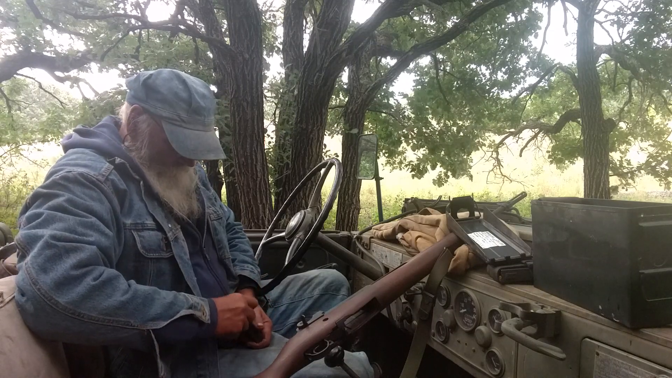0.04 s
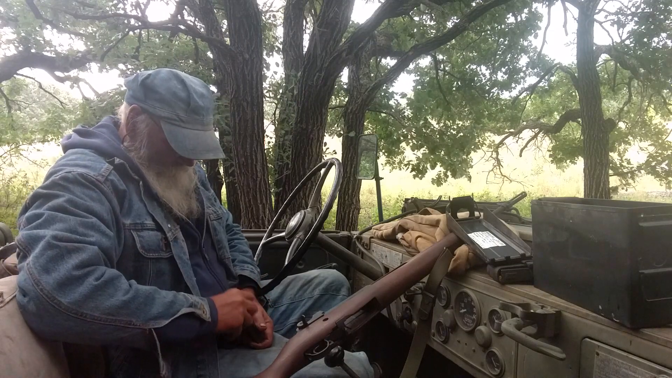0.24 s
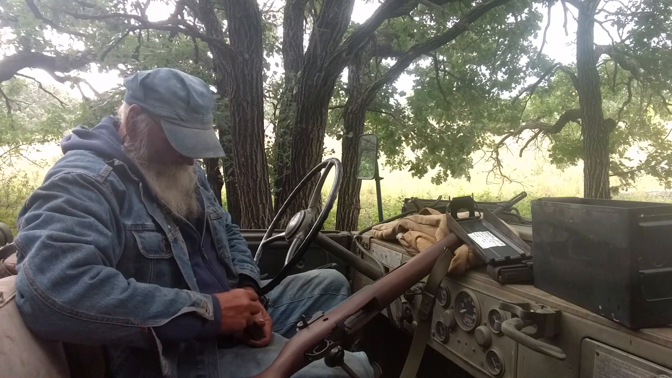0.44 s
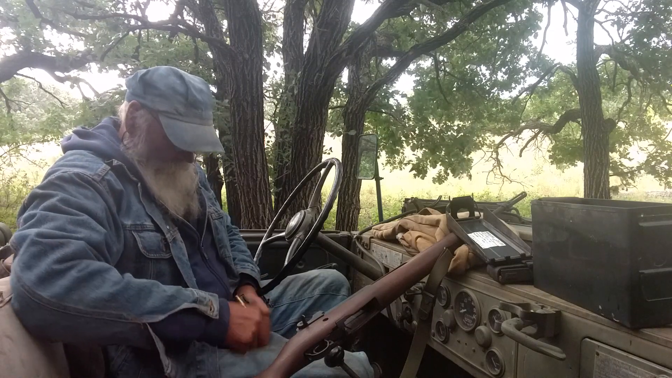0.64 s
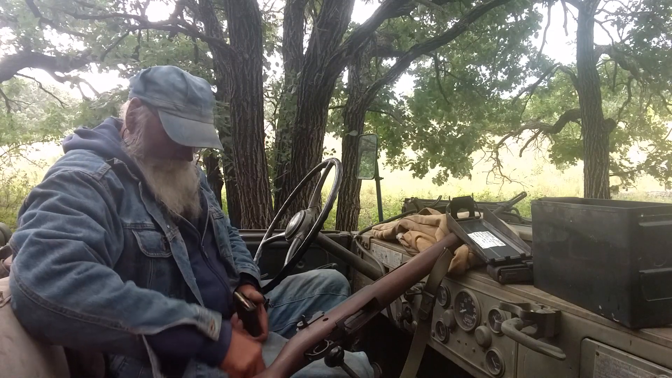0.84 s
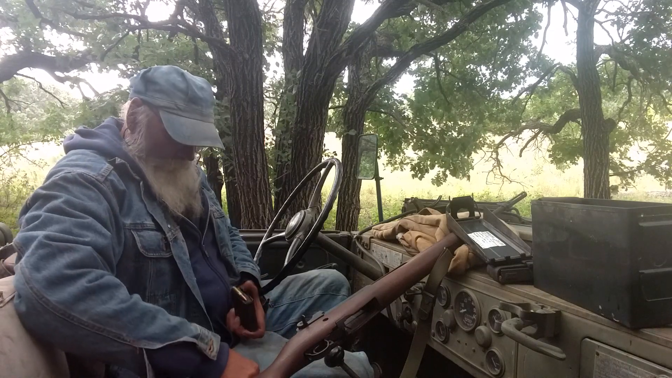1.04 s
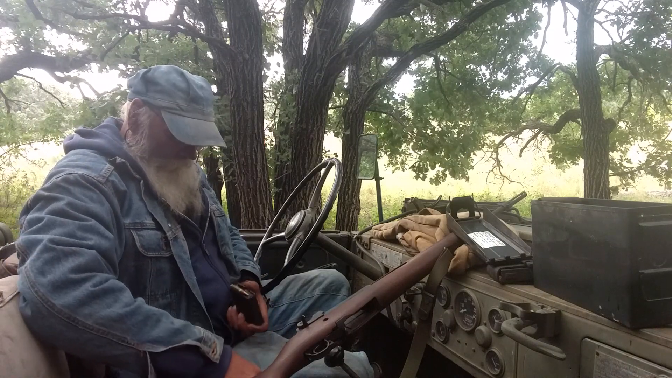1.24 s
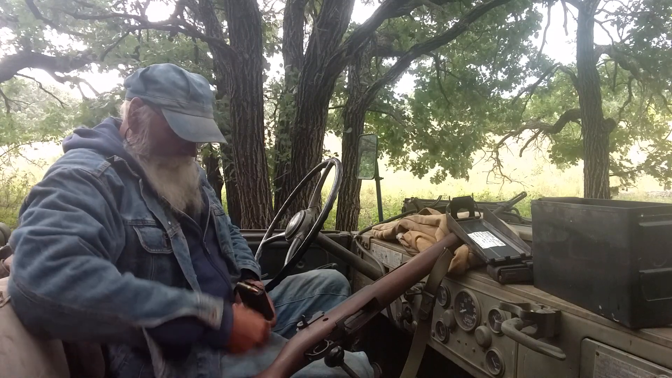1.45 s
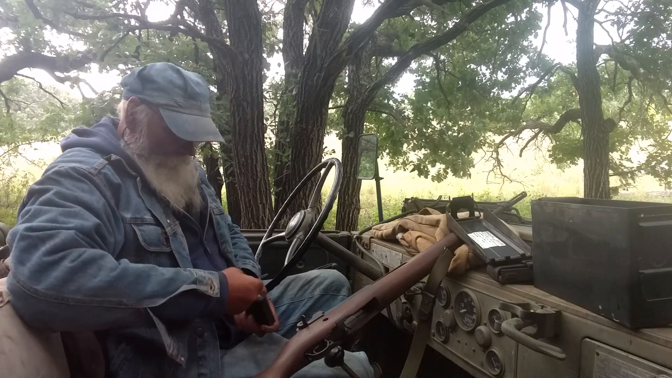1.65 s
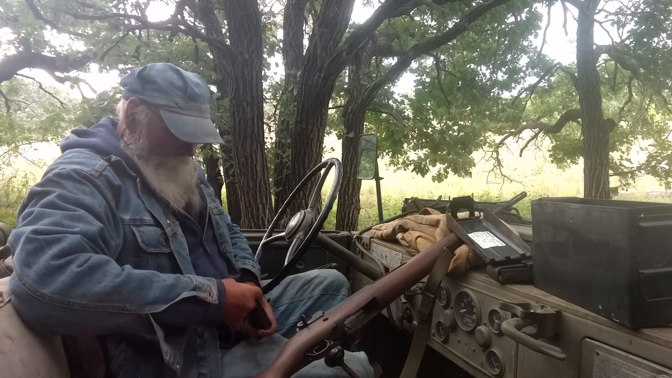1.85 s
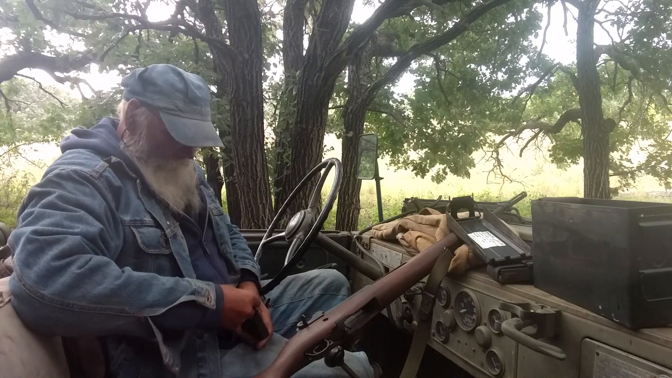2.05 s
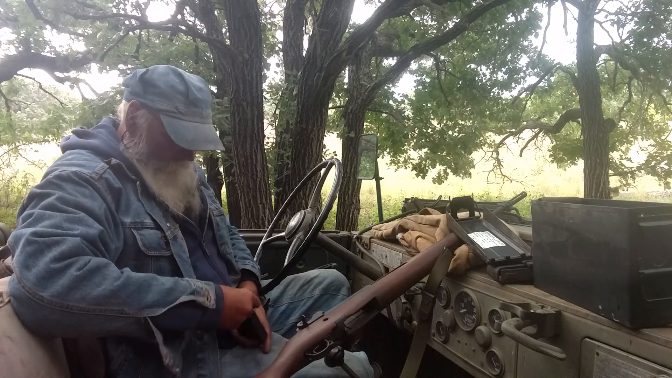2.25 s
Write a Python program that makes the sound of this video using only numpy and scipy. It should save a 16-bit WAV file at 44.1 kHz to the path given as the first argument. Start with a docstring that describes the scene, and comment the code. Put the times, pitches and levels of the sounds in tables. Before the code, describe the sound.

Sharp hollow metallic clicks of cartridges pressed into a magazine outdoors, with faint wind and soft microphone bumps

```python
"""Under trees, wind hisses in the leaves throughout (patchy filtered noise over a lumpy low rumble),
and now and then it bumps the microphone: short low puffs, the strongest in the last half second.
Cartridges pressed into a steel magazine give three knocks early on and three late, the middle late one
a small bounce: each knocks the hollow box (two swelling modes) and rattles its metal, with echoes nearby.
The camera's two ports are each subtracted, slightly late, from the other."""
import sys
import numpy as np
from scipy import signal
from scipy.fft import rfft, irfft, next_fast_len
from scipy.io import wavfile
from scipy.ndimage import uniform_filter1d, map_coordinates

SR = 44100
rng = np.random.default_rng(int(sys.argv[2]) if len(sys.argv) > 2 else 0)


def generate_wav(sig):
    """Save sig (samples, or channels by samples) to the path in sys.argv[1] as 16-bit PCM at SR."""
    pcm = np.round(np.clip(np.atleast_2d(sig).T, -1, 1) * 32767).astype(np.int16)
    wavfile.write(sys.argv[1], SR, pcm)


N = 101430


def amp(db):
    """Decibels to an amplitude factor."""
    return 10 ** (np.asarray(db) / 20)


def unit(x):
    """Scale to an RMS of one over all channels together."""
    return x / np.sqrt(np.mean(x ** 2) + 1e-20)


def along(points, hz):
    """Read a curve of (Hz, value) points on a log frequency axis."""
    point_hz, value = np.transpose(points)
    return np.interp(np.log(hz + 1), np.log(point_hz + 1), value)


def wobble(rate):
    """A smooth random curve with this many knots a second."""
    knots = rng.standard_normal(int(N * rate / SR) + 4)
    return map_coordinates(knots, [np.arange(N) * rate / SR])


def filtered(x, response):
    """Multiply the spectrum of x by a response of frequency; padding leaves room for the tail."""
    size = next_fast_len(x.shape[-1] + 8192)
    spectrum = rfft(x, size) * response(np.fft.rfftfreq(size, 1 / SR))
    return irfft(spectrum, size)[..., :x.shape[-1]]


def near(hz, centre_hz, spread):
    """A bell over octaves, 1 at the centre."""
    return np.exp(-(np.log2(hz / centre_hz) / spread) ** 2 / 2)


def swell(u):
    """Rounded pulse envelope that peaks at 1 when u is 1."""
    return (u * np.exp(1 - u)) ** 3


def wind():
    """Patchy leaf hiss, partly shared by the ports, with a lumpy rumble under it."""
    # Level of the hiss: it dips after the early knocks and slowly recovers.
    # Each row: time in seconds, level in dB.
    hiss_level = [(0, -50), (.15, -46.5), (.29, -52), (.52, -51.5), (.8, -48), (1.19, -44.5), (1.75, -44),
                  (2.3, -44.5)]
    # Spectral shape of the leaves. Each row: frequency in Hz, relative density in dB per Hz.
    leaf_tone = [(20, -35), (60, -10.5), (120, 1.5), (400, -3), (1000, -10.5), (1900, -14.5), (2500, -11),
                 (5000, -13), (8000, -17.5), (12000, -28), (15000, -37), (15350, -67), (16200, -75)]
    # Likeness of the ports. Each row: frequency in Hz, correlation (0 to 1).
    likeness = [(50, 0.38), (300, 0.89), (800, 0.44), (2000, 0.047), (12000, 0.045)]
    # Lean to one side. Each row: frequency in Hz, left over right port in dB.
    side_lean = [(60, -0.5), (500, -2.5), (2000, -0.5), (8000, 0.5), (14000, 10.2)]
    rumble_db, rumble_hz = -15.5, 123  # level against the hiss, upper corner
    lumps_db = 5  # scale of the random swings of the rumble

    # Noise smoothed over time and frequency makes patches of louder and softer hiss.
    noise = signal.stft(rng.standard_normal((2, N + 512)), nperseg=512)[2]
    patches = uniform_filter1d(rng.standard_normal(noise.shape[1:]), 6, 0)
    patches = unit(uniform_filter1d(patches, 14, 1))
    pair = signal.istft(noise * amp(0.95 * patches), nperseg=512)[1][:, :N]

    def mid_side(hz):
        # Half this angle's cosine and sine share the power, so the ports correlate as the table says.
        turn = np.arccos(np.clip(along(likeness, hz), -1, 1)) / 2
        return amp(along(leaf_tone, hz)) * [np.cos(turn), np.sin(turn)]

    mid, side = filtered(pair, mid_side)
    ports = np.array([mid + side, mid - side])
    ports = filtered(ports, lambda hz: amp(np.outer([0.5, -0.5], along(side_lean, hz))))

    def low_band(hz):
        return (hz / 60) / (1 + (hz / 60) ** 2) / (1 + (hz / rumble_hz) ** 2)

    low = filtered(rng.standard_normal((2, N)), low_band)
    rumble = unit(low * amp(lumps_db * wobble(8.2)))

    s, db = np.transpose(hiss_level)
    level = amp(np.interp(np.arange(N) / SR, s, db) + 1.2 * wobble(4.97))
    return level * (unit(ports) + amp(rumble_db) * rumble)


def bumps():
    """Puffs of wind push mainly on the right port: sines under a short swelling envelope."""
    # Each row: start in seconds, envelope peak at the right port in dB, frequency in Hz.
    puffs = [(.090, -42, 70), (.525, -44, 80), (.675, -43, 80), (1.605, -49, 60), (1.700, -44, 45),
             (1.797, -29.5, 96), (1.851, -28.5, 94), (1.866, -22.5, 121), (2.155, -33.5, 89),
             (2.192, -35, 118), (2.225, -41, 50)]
    left_share = -0.03  # of the puff; the right port gets -1
    out = np.zeros(N + SR)
    t = np.arange(SR // 10) / SR
    for s, db, hz in puffs:
        puff = amp(db) * swell(t * hz * 1.13) * np.sin(2 * np.pi * hz * t)
        out[round(s * SR):][:len(t)] += puff
    return out[:N] * np.array([[left_share], [-1]])


def hollow_knock(t, knock_db, first_hz, last_hz, upper_db, upper_hz, rise):
    """The hollow box: a low mode whose pitch glides to rest, less a steady upper mode."""
    settle_s = 0.0042  # time constant of the glide
    upper_rise = 0.73 * rise  # the upper mode swells faster
    turns = last_hz * t + (first_hz - last_hz) * settle_s * (1 - np.exp(-t / settle_s))
    low = amp(knock_db) * swell(t / (3 * rise)) * np.sin(2 * np.pi * turns)
    upper = amp(upper_db) * swell(t / (3 * upper_rise)) * np.sin(2 * np.pi * upper_hz * t)
    return low - upper


def metal_rattle(t, rise, metal_db, ring_hz, tilt_db):
    """Brass and steel: a noisy crack of small contacts and unsteady ringing modes, on two ports."""
    # Frequencies of the metal modes in Hz.
    mode_hz = [1340, 1710, 2070, 2375, 3320, 3540, 3860, 4300, 5545, 5835, 6490, 7160, 8550, 11850, 13900]
    # One row for each mode: relative level in dB, time to decay by 60 dB in seconds.
    modes = [(-8, 0.031), (-11, 0.034), (-10, 0.061), (-3, 0.036), (2.5, 0.021), (3.5, 0.026), (-4, 0.034),
             (0, .015), (-3.5, 0.025), (-4, 0.022), (-5, .015), (-7.5, 0.034), (-6, 0.013), (-34, .02),
             (-3, 0.014)]
    # Tone of the bare contacts. Each row: frequency in Hz, gain in dB.
    crack_tone = [(300, -37), (600, -3), (2000, 7.5), (5000, 7), (10000, 0), (14500, -11), (16000, -20)]
    contact_s, crack_db = 0.0034, 22  # time scale of the contacts, gain of their crack
    boost_db, boost_oct = 13, 0.1  # lift of modes near ring_hz, its spread in octaves
    line_width_hz, ring_rise_s = 40, 0.0019  # unsteadiness of the modes, time scale of their build-up

    late = np.maximum(t - 1.02 * rise, 0)  # the metal starts while the knock is still swelling
    u = late / contact_s
    contacts = rng.standard_normal((2, len(t))) * u * np.exp(-2 * u ** 1.37)
    contacts /= np.linalg.norm(contacts[0])

    def tilt(hz):
        return tilt_db * np.log2((hz + 1) / 4000)

    crack = amp(crack_db) * filtered(contacts, lambda hz: amp(along(crack_tone, hz) + tilt(hz)))

    hz = np.array(mode_hz)[:, None]
    db, t60 = np.transpose(modes)[..., None]
    steps = rng.standard_normal((len(modes), len(t)))
    wander = np.cumsum(steps, axis=1) * np.sqrt(line_width_hz * 2 * np.pi / SR)
    phase = 2 * np.pi * (hz * t + rng.random(hz.shape)) + wander
    mode_db = db + boost_db * near(hz, ring_hz, boost_oct) + tilt(hz) + rng.normal(0, 0.69, hz.shape)
    ring = (amp(mode_db - 60 * late / t60) * np.sin(phase)).sum(0)
    ring = ring * (1 - np.exp(-(late / ring_rise_s) ** 2))
    return amp(metal_db) * (ring + crack)


def magazine():
    """Every contact knocks and rattles, and reaches the two ports at its own level and lag."""
    # Knocks of the cartridges; the fifth is a small bounce.
    # Each row: start in seconds, knock level in dB, first and last pitch of the low mode in Hz,
    # upper mode level in dB, upper mode pitch in Hz, rise in seconds (a third of the low mode's time to peak),
    # metal gain in dB, favoured ring in Hz, metal tilt in dB per octave,
    # left over right port in dB, delay of the left port in seconds.
    knocks = [(0.2, -35.5, 756, 740, -52, 1120, 0.0017, -47, 2370, -0.5, -13, 0.000069),
              (0.2223, -14, 1114, 463, -15, 1062, 0.0012, -27, 6040, 0, -5, 0.00012),
              (0.3636, -27.5, 720, 638, -45, 1110, 0.0011, -52, 3570, -2, 3, 0.00013),
              (1.7576, -29.5, 734, 665, -37, 994, 0.0013, -33, 5400, 1, -11, .00012),
              (1.7750, -44, 740, 670, -54, 1070, 0.0024, -48, 5600, 1, -1, 0.00016),
              (1.8247, -26.5, 815, 800, -37.5, 1130, 0.00088, -35, 2400, -0.5, 6.5, 0.000083)]
    out = np.zeros((2, N + SR))
    t = np.arange(SR // 10) / SR
    for s, *box, rise, metal_db, ring_hz, tilt_db, pan_db, lag in knocks:
        contact = hollow_knock(t, *box, rise) + metal_rattle(t, rise, metal_db, ring_hz, tilt_db)

        def way_to_ports(hz):
            delay = np.exp(-2j * np.pi * hz * np.array([[lag], [0]]))
            return amp([[pan_db / 2], [-pan_db / 2]]) * delay

        sound = filtered(contact, way_to_ports)
        out[:, round(s * SR):][:, :sound.shape[1]] += sound
    return out[:, :N]


def nearby(x):
    """Scattered echoes of bodywork and trunks: noise in which each frequency dies at its own speed."""
    # Each row: frequency in Hz, time to decay by 60 dB in seconds.
    echo_decay = [(300, 0.085), (1000, 0.085), (4000, 0.2), (12000, 0.3)]
    # Each row: frequency in Hz, echo gain in dB.
    echo_tone = [(500, -12.5), (1500, -17), (4000, -11), (12000, -16.5)]
    hz, t, noise = signal.stft(rng.standard_normal((2, SR // 4)), SR, nperseg=128)
    fade = amp(-60 * t / along(echo_decay, hz)[:, None])
    tail = signal.istft(noise * fade, SR, nperseg=128)[1]
    tail = tail / np.linalg.norm(tail[0])
    delayed = np.pad(x, ((0, 0), (200, 0)))  # samples before the first echo
    echoes = signal.fftconvolve(delayed, tail, axes=1)[:, :N]
    return filtered(echoes, lambda hz: amp(along(echo_tone, hz)))


def scene():
    """Wind, bumps, knocks and their echoes at the two microphone ports."""
    clicks = magazine()
    return wind() + bumps() + clicks + nearby(clicks)


def record(dry):
    """Each channel is its port minus the other port a moment later; nothing above the band limit."""
    # What the left, then the right channel takes from the other port.
    # Each row: frequency in Hz, share of that port (0 to 1).
    cross_left = [(100, 0.87), (1300, 1), (2600, .99), (4000, 0.76), (7000, 0.56), (12000, 0.41)]
    cross_right = [(100, 0.71), (1300, 1), (2600, 1), (4000, 0.65), (7000, 0.32), (12000, 0.6)]
    port_lag_s, top_hz = 0.0003898, 16225

    def crossing(hz):
        share = np.clip([along(cross_left, hz), along(cross_right, hz)], 0, 1)
        return share * np.exp(-2j * np.pi * hz * port_lag_s)

    late = filtered(dry[::-1], crossing)
    return filtered(dry - late, lambda hz: hz < top_hz)


dry = scene()
out = record(dry)
generate_wav(out)
```